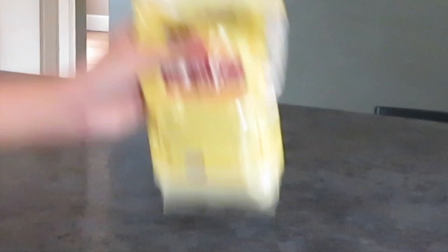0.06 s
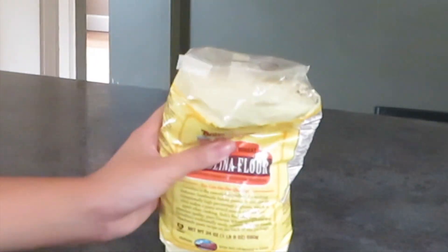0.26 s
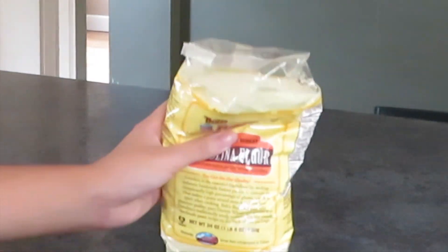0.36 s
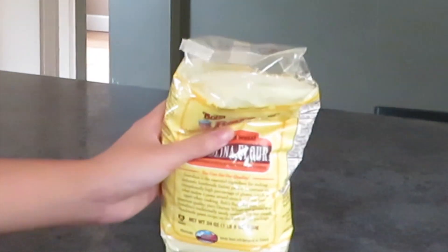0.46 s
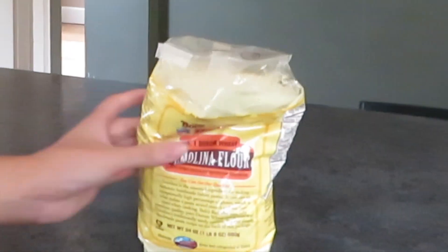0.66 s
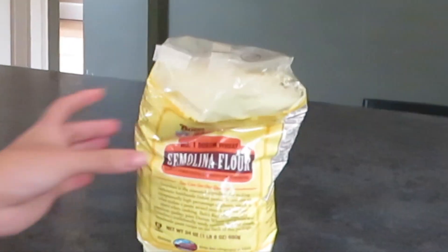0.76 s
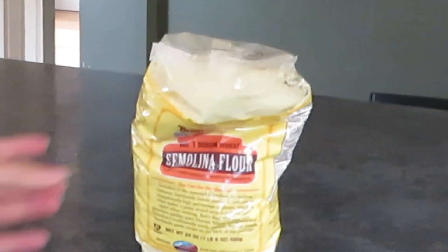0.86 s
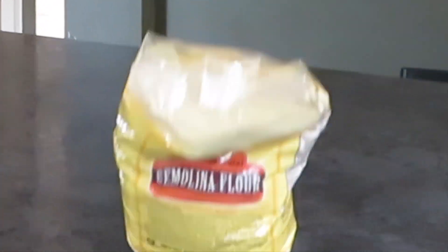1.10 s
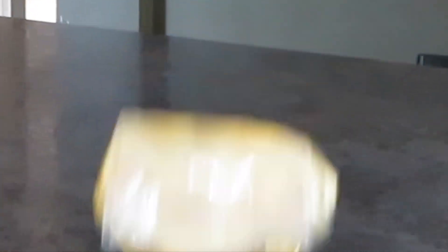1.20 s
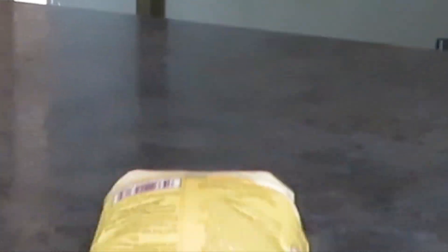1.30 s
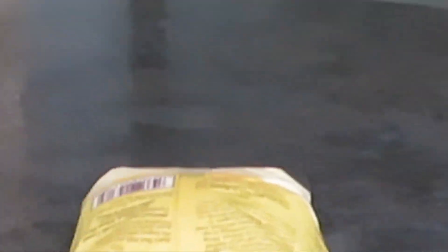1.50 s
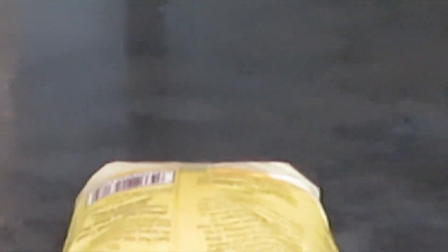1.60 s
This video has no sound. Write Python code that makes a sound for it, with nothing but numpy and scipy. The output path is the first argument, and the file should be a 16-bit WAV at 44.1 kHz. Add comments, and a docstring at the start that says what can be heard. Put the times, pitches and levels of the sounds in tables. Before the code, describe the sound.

Close to the microphone, a full plastic flour bag is set down on a table with a heavy thud. The plastic ticks faintly, then the bag topples with a sharp slap, ringing briefly in a quiet, hard-walled room.

```python
"""A table in a quiet, hard-walled room with a faint hum; a stereo microphone stands close by.
A plastic bag of flour rustles in the hand and is set down: its base meets the top in a quick run of
contacts, creases snap and the weight thumps the table's low modes. The film ticks as the hand lets go;
fingers nudge the bag, it rolls over the edge of its base and slaps flat in a second run of contacts.
The room rings and the gain ducks after each landing."""
import sys
import numpy as np
from scipy import signal
from scipy.fft import rfft, irfft
from scipy.io import wavfile
from scipy.ndimage import uniform_filter1d

SR = 44100
rng = np.random.default_rng(int(sys.argv[2]) if len(sys.argv) > 2 else 0)


def wrap_up_sound(samples):
    """Save the sound to the file named by the first command line argument, as 16-bit audio."""
    columns = np.atleast_2d(samples).T
    # keep every value between -1 and 1, then stretch to whole-number steps
    tamed = np.clip(columns, -1, 1)
    steps = np.round(tamed * 32767).astype(np.int16)
    wavfile.write(sys.argv[1], SR, steps)


N = 72765


def undb(db):
    """Decibels to gain."""
    return 10 ** (np.asarray(db) / 20)


def colour(x, points, lag=1, size=8192):
    """Filter with a (Hz, dB) outline; causal at lag 1, symmetric in time at 0."""
    hz, db = np.array(points, float).T
    half = size // 2
    log_hz = np.log(np.arange(half + 1) * SR / size + 1)
    cepstrum = irfft(np.log(undb(np.interp(log_hz, np.log(hz), db))))
    cepstrum[1:half] *= 2  # fold to minimum phase
    cepstrum[half + 1:] = 0
    response = rfft(cepstrum)
    kernel = np.roll(irfft(np.exp(response.real + 1j * lag * response.imag)), half)
    return signal.oaconvolve(x, kernel if x.ndim == 1 else kernel[None], axes=-1)[..., half:half + N]


def since(start):
    """Seconds from a moment, at every sample."""
    return np.arange(N) / SR - start


def burst(start, decay_s):
    """Dying noise of unit energy."""
    first = int(start * SR)
    t = np.arange(min(N - first, SR // 5)) / SR
    x = rng.standard_normal(SR // 5)[:len(t)] * np.exp(-t / decay_s)
    out = np.zeros(N)
    out[first:first + len(t)] = x / np.sqrt(np.sum(x ** 2))
    return out


def click(start):
    """A unit impulse."""
    return 1. * (np.arange(N) == int(start * SR))


def wander(count):
    """A smooth random curve through count points, spread near 1."""
    return signal.resample(rng.standard_normal(count), N)


def stereo(mid, side):
    """The microphone's two closely spaced ports: alike in the bass, apart in the treble."""
    # Stereo width. Each row: frequency in Hz, gain of the side signal in dB.
    width = [(60, -41), (250, -12), (1000, -18), (2000, -19.5), (4000, -5), (8000, -3.5), (14000, 1.5)]
    side = colour(side, width)
    return np.array([mid + side, mid - side])


def background():
    """The still air of the room and a faint hum that wavers."""
    # Spectrum of the air. Each row: frequency in Hz, gain in dB.
    air_colour = [(25, 4), (60, 0), (120, 1.5), (200, -1.5), (400, 2), (700, -7), (1600, -10),
                  (3000, -16.5), (6000, -27), (11000, -33.5), (16000, -48)]
    # Tones of the hum. Each row: frequency in Hz, level in dB.
    tones = [(119, -44.5), (174, -51.5)]
    air = undb(-31) * colour(stereo(*rng.standard_normal((2, N))), air_colour)
    hum = 0
    for hz, db in tones:
        level = undb(db + 1.5 * wander(count=14))
        hum += level * np.sin(2 * np.pi * hz * since(0) + .5 * wander(count=14))
    return air + hum


def rustle():
    """Dense tiny crackles swell and fade as the film rubs and flexes."""
    # The bag slides in the hand or rocks on its base.
    # Each row: peak time in seconds, relative level in dB, rise and decay in seconds.
    moves = [(.105, -2.5, 0.027, 0.041), (.16, -3.5, 0.022, 0.12), (0.279, 19, 0.00066, .003),
             (0.375, 9, 0.0012, 0.0026), (0.573, 4.5, 0.0012, 0.0089), (.745, -8.5, 0.04, 0.049),
             (1.279, -5, 0.0079, 0.045), (1.369, -0.5, 0.0027, 0.0086)]
    # Spectrum of the rubbing film. Each row: frequency in Hz, gain in dB.
    film_colour = [(100, -6), (500, -6.5), (1200, -3.5), (2200, -0.5), (3200, -9), (5000, -19), (8000, -27),
                   (12000, -26.5), (16000, -36)]
    effort = sum(undb(db) * np.exp(-np.maximum(-since(s) / rise, since(s) / decay))
                 for s, db, rise, decay in moves)
    grains = rng.standard_normal((2, N)) * undb(2 * rng.standard_normal(N))
    return undb(-27.5) * colour(stereo(*(effort * grains / grains.std())), film_colour)


def landing(contacts, outline, grit, grit_s):
    """Patches of film slap the table in turn. Returns the close sound and one blow for the room."""
    # Fine crunch of film and flour behind each contact. Each row: frequency in Hz, gain in dB.
    crunch_colour = [(500, -14), (3000, -1), (5000, -2.5), (7000, -6), (10000, -3), (13000, -2.5),
                     (16000, -19)]
    mid = sum(undb(db) * (click(s) + grit * burst(s, grit_s)) for s, db in contacts)
    side = sum(undb(db) * 0.18 * burst(s, grit_s) for s, db in contacts)
    slaps = colour(stereo(mid, side), outline, lag=0.48)  # each contact swells a little before its peak
    grains = [sum(undb(db) * burst(s, decay_s=0.0032) for s, db in contacts) for _ in range(2)]
    direct = slaps + undb(-27.5) * colour(stereo(*grains), crunch_colour)
    times, levels = np.array(contacts).T
    energy = undb(levels) ** 2
    blow = np.sqrt(energy.sum()) * click(np.average(times, weights=energy))
    return direct, colour(blow, outline, lag=0) + undb(-24) * colour(blow, crunch_colour, lag=0)


def set_down():
    """The base of the bag lands close to the microphone. Returns the close sound and the room's blow."""
    # Contacts of the base. Each row: start in seconds, relative level in dB.
    contacts = [(.2130, -14), (.2146, -14.5), (.2161, 3), (.2169, -2), (.2229, 0.5), (.2308, -9.5)]
    # Spectrum of one contact. Each row: frequency in Hz, gain in dB.
    base_colour = [(40, -10), (120, 3), (350, 5), (600, -5), (900, 0.5), (1300, -1.5), (1800, 4),
                   (2900, -5.5), (4200, -20), (7000, -28), (16000, -30.5)]
    direct, blow = landing(contacts, base_colour, grit=1, grit_s=0.0031)
    return undb(21) * direct, undb(21) * blow


def snaps():
    """Creases of the film flip over with bright ticks."""
    # Snapping creases. Each row: start in seconds, relative level in dB.
    creases = [(.2160, 6), (0.221, 1.5), (0.277, -14), (0.574, -18.5), (1.265, -30), (1.332, -31),
               (1.3864, -1.5)]
    # Spectrum of a snap. Each row: frequency in Hz, gain in dB.
    snap_colour = [(300, -16), (2500, -13), (5000, -0.5), (8000, -1.5), (11500, 0), (16000, -21)]
    mid, side = (sum(undb(db) * burst(s, decay_s=0.0011) for s, db in creases) for _ in range(2))
    return undb(3.5) * colour(stereo(mid, .7 * side), snap_colour)


def thump():
    """The weight of the flour meets the table: a soft, heavy push rings its low modes."""
    # Table modes. Each row: frequency in Hz, relative level in dB, seconds to fall 60 dB.
    modes = [(53.4, -18, 0.94), (77, -10.5, 0.17), (92, -12, 0.3), (102, 0.5, 0.12), (169.7, -13.5, 0.33),
             (202.6, -22.5, 0.36), (246.8, -10.5, 0.34), (272, -24.5, 0.99), (322.7, -20, 0.5),
             (368.5, -10, 0.39), (454.7, -8, 0.56)]
    # How well the table radiates. Each row: frequency in Hz, gain in dB.
    radiation = [(20, -17.5), (45, -7.5), (70, -3), (16000, 6)]
    start_s, push_s = .2168, .0016
    t = np.maximum(since(start_s), 0)
    ring = sum(undb(db) * np.sin(2 * np.pi * hz * t) * np.exp(-np.log(1000) * t / t60)
               for hz, db, t60 in modes)
    push = np.exp(-(since(0) / push_s * 2 - 1) ** 2)
    motion = -undb(-2) * signal.fftconvolve(ring, push / push.sum())[:N]
    return colour(motion, radiation)


def finger_taps():
    """Fingers leave the bag, then nudge it; the flour damps the film."""
    # Dull taps. Each row: start in seconds, relative level in dB, decay in seconds.
    taps = [(.7790, 1.5, 0.0021), (1.147, -3, .016)]
    # Spectrum of a tap on the full bag. Each row: frequency in Hz, gain in dB.
    tap_colour = [(200, -18), (800, -8), (1500, 2), (2900, 1.5), (4200, -16), (6000, -30), (16000, -43)]
    touches = sum(undb(db) * burst(s, decay) for s, db, decay in taps)
    return undb(-4) * colour(touches, tap_colour)


def roll():
    """The tipping bag rolls its weight over the edge of its base with a low rumble."""
    # Spectrum of the rumble. Each row: frequency in Hz, gain in dB.
    rumble_colour = [(40, -12), (120, 2.5), (300, -3), (600, -14), (1500, -28), (16000, -60)]
    peak_s, spread_s = 1.268, 0.075
    swell = np.exp(-(since(peak_s) / spread_s) ** 2)
    return undb(-25.5) * colour(rng.standard_normal(N) * swell, rumble_colour)


def fall_flat():
    """The side of the bag slaps the table. Returns the close sound and the room's blow."""
    # Contacts of the side. Each row: start in seconds, relative level in dB.
    contacts = [(1.3746, -5.5), (1.3771, 0), (1.3788, -4.5), (1.3799, -4.5), (1.3816, -5), (1.3823, -1),
                (1.3866, -3), (1.3900, -10), (1.3914, -3.5), (1.3923, -2.5)]
    # Spectrum of one contact. Each row: frequency in Hz, gain in dB.
    side_colour = [(40, -19), (150, -17.5), (320, -8), (550, -0.5), (850, -4.5), (1400, 5), (2400, -1.5),
                   (3100, -9), (4200, -19), (7000, -30), (16000, -45)]
    direct, blow = landing(contacts, side_colour, grit=0.93, grit_s=0.0011)
    return undb(22) * direct, undb(22) * blow


def reflections():
    """One random response of the hard walls: early echoes and a tail that dies band by band."""
    # The room's tail. Each row: frequency in Hz, seconds to fall 60 dB, level in dB.
    bands = [(61.6, 0.95, 6), (168, 0.5, 5), (406, 0.79, 4.5), (740, 0.91, -1.5), (1540, 0.99, -4.5),
             (2900, 0.81, -2), (5100, 0.92, 2), (9200, 0.63, -2.5), (15200, 0.51, -4)]
    onset_s = 0.011
    t = np.arange(SR) / SR
    spectrum = rfft(rng.standard_normal(SR))
    log_hz, log_centres = np.log(np.arange(SR // 2 + 1) + 1), np.log([row[0] for row in bands])
    tail = 0
    for share, (_, t60, db) in zip(np.eye(len(bands)), bands):
        band = irfft(spectrum * np.interp(log_hz, log_centres, share))
        fade = np.exp(-np.log(1000) * t / t60) * np.minimum(t / onset_s, 1)
        tail += undb(db) * band * fade / np.sqrt(np.sum(fade ** 2))
    early = undb(-4.5) * burst(0.0053, decay_s=0.031)[:SR]
    return tail + early


def gain_control(x):
    """Loud moments pull the gain down; it creeps back at a steady rate."""
    threshold_db, share_removed, attack_s, recover_db_per_s = -22.5, 0.5, 0.042, 6
    power = uniform_filter1d(x.mean(axis=0) ** 2, size=441)
    excess_db = np.maximum(10 * np.log10(np.abs(power) + 1e-12) - threshold_db, 0)
    ramp = recover_db_per_s * since(0)
    cut_db = np.maximum.accumulate(share_removed * excess_db + ramp) - ramp
    pole = np.exp(-1 / (attack_s * SR))
    return x * undb(-signal.lfilter([1 - pole], [1, -pole], cut_db))


def scene():
    """What reaches the microphone: bag and table from close up, then the walls' reply, over room tone."""
    base, base_blow = set_down()
    slap, slap_blow = fall_flat()
    table, ticks, film = thump(), snaps(), rustle() + finger_taps()
    to_room = (undb(-1.5) * base_blow + undb(-4) * slap_blow + undb(-12) * table
               + undb(-16) * ticks.mean(axis=0) + undb(-3.5) * film.mean(axis=0))
    room = stereo(*(signal.fftconvolve(to_room, reflections())[:N] for _ in range(2)))
    return base + slap + table + ticks + film + room + roll() + background()


def record(dry):
    """Behind the microphone: the gain ducks, the level dips twice, peaks clip and the top is cut."""
    # Brief dips in level. Each row: centre in seconds, half length in seconds, depth in dB.
    dips = [(.141, 0.0073, -16), (.709, 0.0056, -19)]
    top_hz = 15600
    dip_db = sum(db * np.exp(-(since(s) / half) ** 2) for s, half, db in dips)
    clipped = np.clip(gain_control(dry) * undb(dip_db), -1, 1)
    return signal.sosfilt(signal.ellip(8, .2, 70, top_hz, fs=SR, output="sos"), clipped)


dry = scene()
out = record(dry)
wrap_up_sound(out)
```